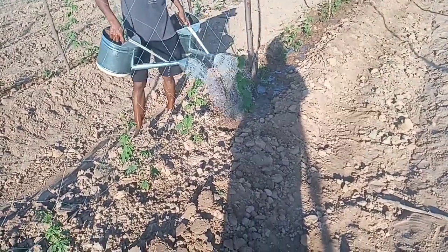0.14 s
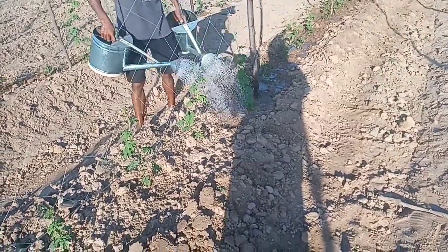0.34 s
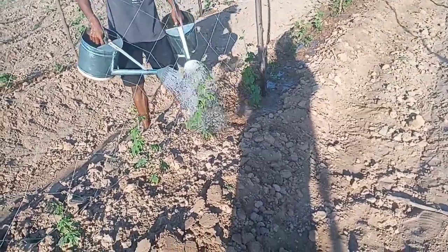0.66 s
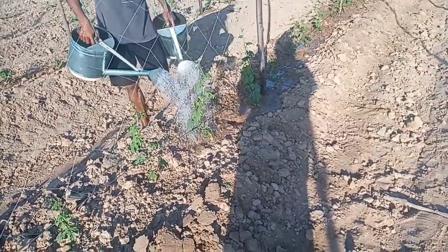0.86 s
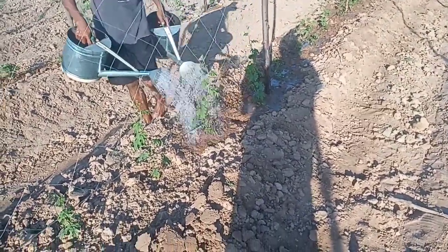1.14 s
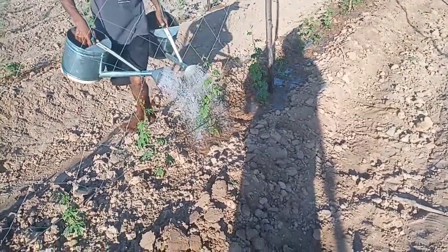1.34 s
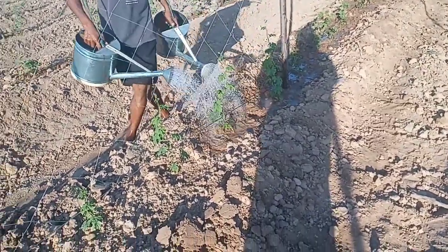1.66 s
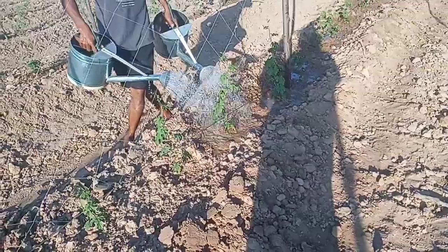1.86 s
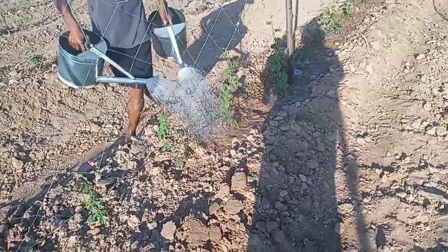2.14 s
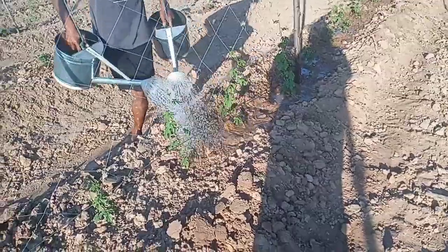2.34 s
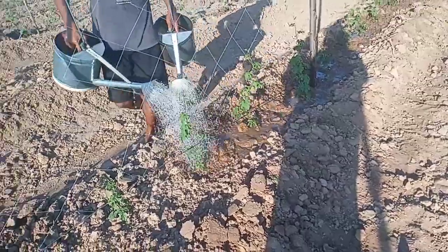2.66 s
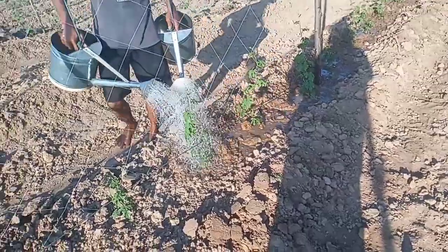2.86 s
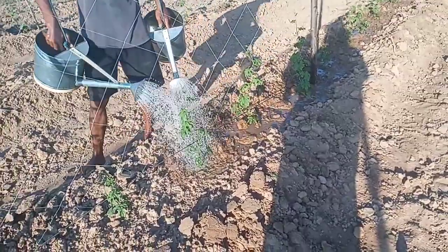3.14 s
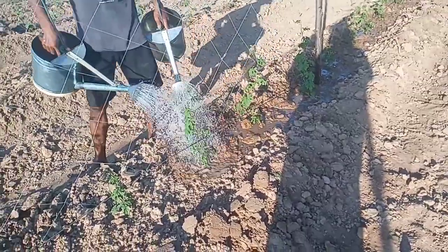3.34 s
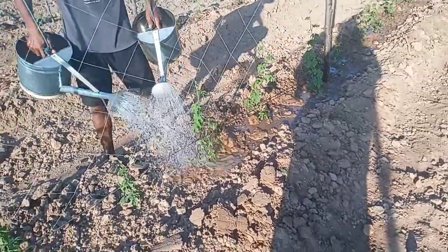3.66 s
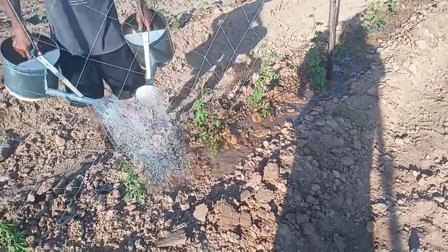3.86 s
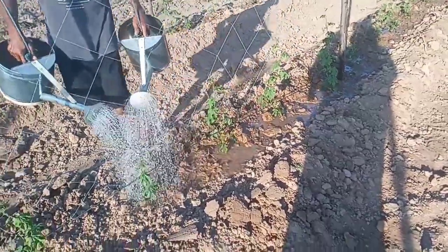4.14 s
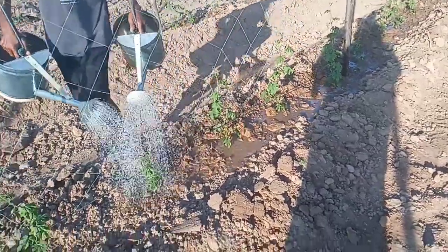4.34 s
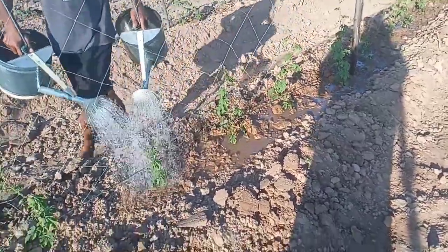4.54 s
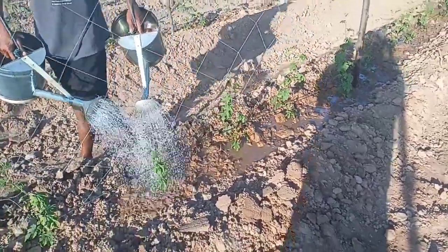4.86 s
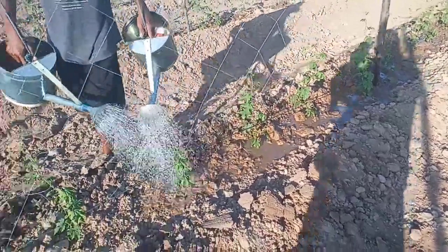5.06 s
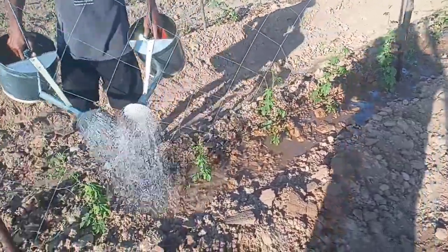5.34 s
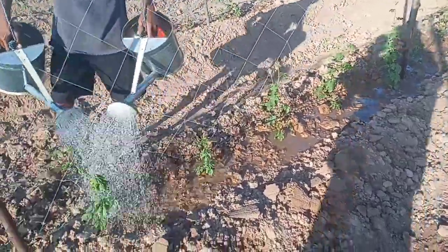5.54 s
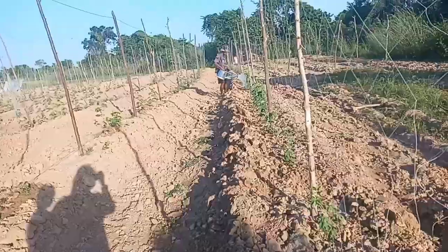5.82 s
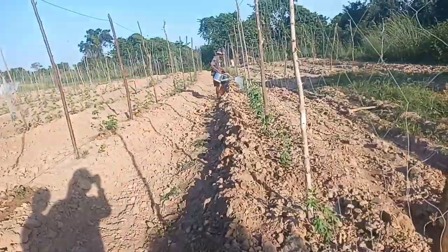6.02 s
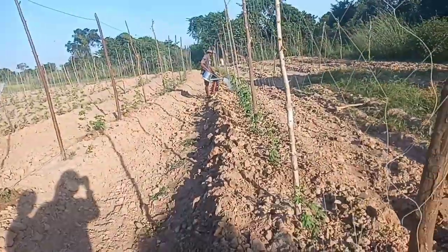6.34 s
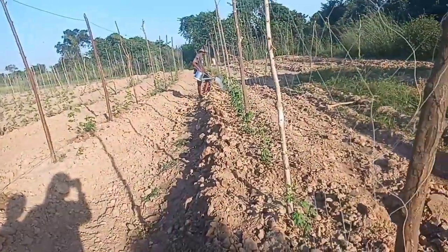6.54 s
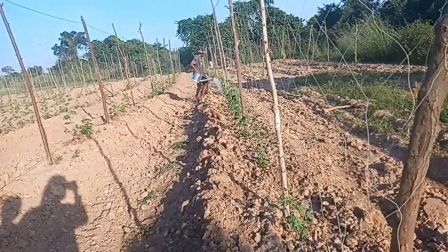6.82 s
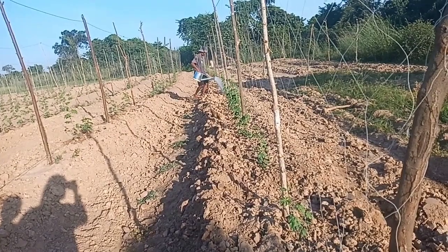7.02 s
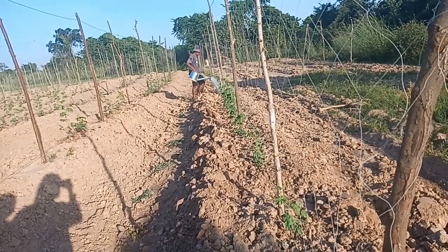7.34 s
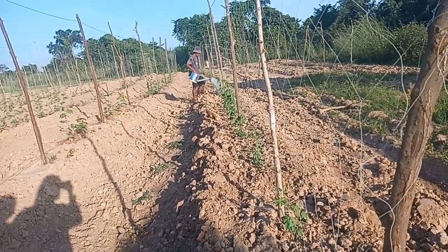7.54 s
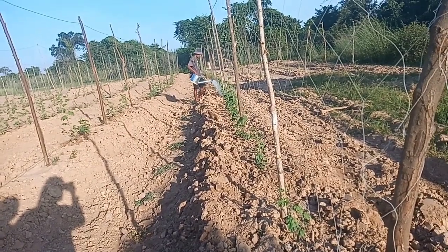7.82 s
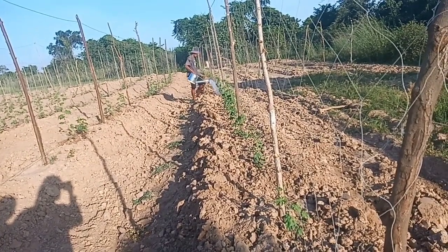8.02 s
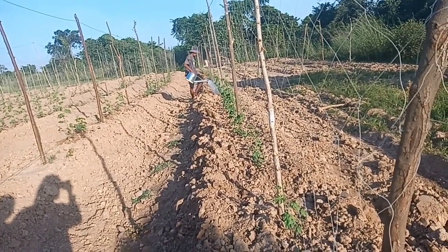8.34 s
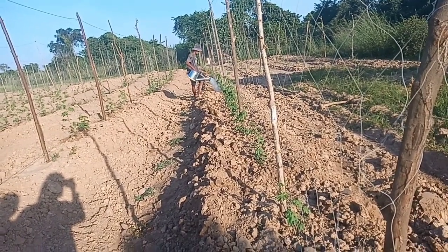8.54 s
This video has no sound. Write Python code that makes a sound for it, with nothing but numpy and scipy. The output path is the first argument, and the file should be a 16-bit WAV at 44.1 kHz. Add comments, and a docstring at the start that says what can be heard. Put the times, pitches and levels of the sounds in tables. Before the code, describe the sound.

From 0 to 5.7 seconds, two watering cans shower dry soil close by in an open field. Crisp mid-high patter mixes with wet puddle splashing and airy mist, swelling around 1.3, 1.8, 3.1 to 3.6 and 4.7 to 5.3, thinning near 0.7, 2.4, 4.1 and 5.5. Fat drops tick and plink throughout; run-off gurgles low, clearest near 0.5 and 4.9. A very close reflection makes the water slightly hollow. Faint low engine throbbing and wind rumble lie beneath, with a microphone thump at 4.2. At 5.7 the shower cuts abruptly with a tiny dull tick; a distant view fades in by 6.1. The watering is now much quieter, blurred and patchy. A high cricket chirps about seven times a second, faint falling cheeps come at 6.2 and 6.8, and the far engine wavers and weakens. Soft wind bumps occur near 6.1 and 7.4. It ends at 8.7.

```python
"""Watering cans on dry soil

Two watering cans shower dry soil and seedlings in an open field: close by, then, after a cut and fade-in, far off.
Showers are clumped random impulses over noise, filtered into patter, splash and mist; a few big drops ring
as decaying sines, and run-off gurgles in narrow bands. A nearby surface echoes the close shower about 1 ms late.
A cricket and a bird are gliding sines, a small far engine is puffs through a resonance, and wind is low noise
with thumps on the microphone. A noise suppressor thins it all."""
import sys
import numpy as np
from scipy import signal
from scipy.fft import rfft, irfft, next_fast_len
from scipy.io import wavfile
from scipy.ndimage import uniform_filter1d, minimum_filter1d, map_coordinates

SR = 44100
rng = np.random.default_rng(int(sys.argv[2]) if len(sys.argv) > 2 else 0)


def inscribe(sig):
    """Save sig as 16-bit PCM at rate SR to the path in sys.argv[1].

    A 1-D sig is mono; a 2-D sig holds one channel per row.
    Samples are clipped to [-1, 1] before scaling.
    """
    pcm = np.round(np.clip(np.atleast_2d(sig).T, -1, 1) * 32767)
    wavfile.write(sys.argv[1], SR, pcm.astype(np.int16))


N = 382788
CUT_S = 5.7128   # close view before, far view after


def amp(db):
    """Decibels to gain."""
    return 10 ** (np.asarray(db) / 20)


def rms_one(x):
    """Scale to unit rms."""
    return x / np.sqrt(np.mean(x ** 2) + 1e-20)


def in_time(rows):
    """Table columns as curves, one value a sample; the first column is time in seconds."""
    s, *columns = np.transpose(rows)
    return [np.interp(np.arange(N) / SR, s, c) for c in columns]


def drift(rate_hz):
    """Slow random curve of rms 1: two-pole low-passed noise, computed every 40 samples."""
    pole = np.exp(-2 * np.pi * rate_hz * 40 / SR)
    noise = rng.standard_normal(N // 40 + 2002)
    slow = signal.lfilter([1], [1, -2 * pole, pole ** 2], noise)[2000:]   # settled part
    return np.interp(np.arange(N) / 40, np.arange(len(slow)), rms_one(slow))


def colour(x, spectrum):
    """Minimum-phase filter of unit energy, its spectral shape given as (Hz, relative dB) rows."""
    hz, db = np.transpose(spectrum)
    grid_hz = np.maximum(np.linspace(0, SR / 2, 4097), 1)
    grid_db = np.interp(np.log(grid_hz), np.log(hz), db)
    cepstrum = irfft(np.log(amp(grid_db)))
    cepstrum[1:4096] *= 2   # fold to causal
    cepstrum[4097:] = 0
    response = irfft(np.exp(rfft(cepstrum)))
    return signal.oaconvolve(x, response / np.sqrt(np.sum(response ** 2)))[:N]


def patchy(x, low_hz, high_hz, depth_db, rate_hz):
    """Ten narrow bands swell and sink, each in its own time; rms 1."""
    edges_hz = np.geomspace(low_hz, high_hz, 11)
    total = np.zeros(N)
    for k, edge_pair in enumerate(zip(edges_hz, edges_hz[1:])):
        sos = signal.butter(2, edge_pair, "band", fs=SR, output="sos")
        band = signal.sosfilt(sos, x)
        total += (-1) ** k * band * amp(depth_db * drift(rate_hz))
    return rms_one(total)


def drops(per_s, spread_db, clump_db):
    """Drops land at random, uneven in size and in clumps, over the hiss of the finest ones; rms 1."""
    sizes = amp(spread_db * np.minimum(rng.exponential(1, N), 5)) * rng.choice([-1, 1], N)
    landed = rng.random(N) < per_s / SR
    clumps = amp(clump_db * (drift(16) + drift(50)))
    finest = .5 * rng.standard_normal(N)
    return rms_one(clumps * (rms_one(sizes * landed) + finest))


def near_shower():
    """Partly shared drops sound on soil, in puddles and as mist; big drops and gurgle join, a surface echoes all."""
    # Swells over each seedling, thins on the step to the next.
    # Each row: time in seconds, patter on soil in dB, splash in puddles in dB.
    near_levels = [(0.0, -40, -50.5), (0.55, -44.5, -48.5), (0.76, -45, -56), (1.0, -42, -49),
                   (1.3, -39, -44.5), (1.6, -42, -44), (1.78, -39, -44.5), (2.4, -42, -51.5),
                   (2.75, -40, -45), (3.1, -39, -43), (3.57, -39.5, -42.5), (3.92, -44.5, -53),
                   (4.15, -46.5, -51.5), (4.35, -41.5, -49), (4.7, -41.5, -42), (5.3, -41.5, -43),
                   (5.48, -46, -51.5), (5.7, -46.5, -49.5)]
    # Each row of the three colours: frequency in Hz, relative level in dB per Hz.
    patter_colour = [(900, -53.5), (1800, -6.5), (2600, -3), (3300, -0.5), (3950, 0.5), (4600, -7),
                     (5500, -18), (6300, -14.5), (7300, -20.5), (8500, -74), (15000, -37)]
    splash_colour = [(350, -22), (600, -7.5), (780, -1), (1000, -0.5), (1300, -0.5), (1800, 2.5),
                     (2600, -9.5), (5000, -38)]
    mist_colour = [(5000, -10.5), (8000, 1.5), (9800, -5), (11500, -3.5), (12800, -8), (13700, -10),
                   (15400, -1.5)]
    patter_db, splash_db = in_time(near_levels)
    mean_patter_db = np.mean(np.transpose(near_levels)[1])
    mist_db = -62 + .15 * (patter_db - mean_patter_db)   # mist follows a share of the patter's swing
    rain = drops(per_s=5000, spread_db=3.5, clump_db=0.32)
    puddle = drops(per_s=3000, spread_db=4.5, clump_db=-1.34)
    fine = drops(per_s=13000, spread_db=5.0, clump_db=1.0)
    water = amp(patter_db) * colour(rain, patter_colour)
    water += amp(splash_db) * colour(0.45 * rain + 0.78 * puddle, splash_colour)
    water += amp(mist_db) * colour(0.56 * rain + 0.99 * fine, mist_colour)
    water += big_drops() + gurgle()
    return water + echo(water)


def big_drops():
    """Fat drops stand out of the shower, each ringing briefly at its own pitch."""
    # Each row: start in seconds, envelope peak in dB, ring frequency in Hz.
    fat_drops = [(0.0393, -33, 3610), (0.7267, -34, 3940), (1.0665, -32, 3350), (1.2486, -30, 3250),
                 (1.7275, -31, 3890), (2.3745, -29, 3280), (2.7541, -31, 3920), (3.1158, -31, 3220),
                 (3.5309, -30, 1210), (3.5718, -30, 3240), (4.3485, -27, 3910), (4.793, -33, 3780),
                 (5.0699, -32, 1730), (5.3058, -31, 1740)]
    out, age_s, peak_s = np.zeros(N), np.arange(300) / SR, .0006
    envelope = age_s / peak_s * np.exp(1 - age_s / peak_s)
    for s, db, hz in fat_drops:
        out[round(s * SR):][:300] += amp(db) * np.sin(2 * np.pi * hz * age_s) * envelope
    return out


def gurgle():
    """Run-off gurgles as low drop noise in narrow, wavering bands."""
    # Each row: time in seconds, level in dB.
    gurgle_levels = [(0.0, -64), (0.5, -50.5), (1.2, -58.5), (1.8, -54), (2.2, -57), (3.0, -54), (3.6, -55),
                     (4.15, -61), (4.5, -52.5), (4.8, -54), (4.9, -49), (5.0, -54), (5.7, -62.5)]
    # Each row: frequency in Hz, relative level in dB per Hz.
    gurgle_colour = [(150, -20), (250, -7.5), (400, 1.5), (550, 6.5), (900, -17), (1200, -28)]
    level_db, = in_time(gurgle_levels)
    trickle = colour(drops(per_s=600, spread_db=1.5, clump_db=0.5), gurgle_colour)
    return amp(level_db) * patchy(trickle, 192, 1026, depth_db=4.5, rate_hz=6.9)


def echo(x):
    """A dull reflection whose phase turns with pitch, at a moving lag that combs the colour."""
    # Lag as the gardener comes closer. Each row: time in seconds, lag in ms.
    echo_lags = [(0.4, 1.115), (1.2, 1.04), (1.85, 1.095), (2.65, 1.015), (3.45, 1.015), (4.2, 0.875),
                 (5.1, 0.88), (5.55, 0.84)]
    level_db, cut_hz, top_hz = -1, 960, 6000
    turn_rad, turn_hz = 2.1, 1050
    treble_share = 0.48   # still returned above cut_hz, up to top_hz
    lag_ms, = in_time(echo_lags)
    size = next_fast_len(N)
    hz = np.arange(size // 2 + 1) * SR / size
    surface = np.exp(1j * turn_rad * np.tanh((hz / turn_hz) ** 2))
    surface *= treble_share + (1 - treble_share) / (1 + (hz / cut_hz) ** 2)
    surface /= 1 + (hz / top_hz) ** 4
    turned = irfft(rfft(x, size) * surface, size)
    read_at = np.arange(N) - lag_ms * SR / 1000
    return amp(level_db) * map_coordinates(turned, [read_at], order=3)


def far_shower():
    """Distance blurs the drops; the splash's bands sink and swell in patches, as a noise suppressor leaves them."""
    # Each row: time in seconds, patter in dB, splash in dB.
    far_levels = [(6.1, -57, -67.5), (6.3, -55.5, -65.5), (6.8, -57, -68.5), (7.08, -59.5, -69),
                  (7.5, -56, -68), (7.66, -58.5, -66.5), (7.85, -56, -66), (8.3, -59, -70),
                  (8.45, -58, -67.5), (8.68, -59, -73)]
    # Each row of both colours: frequency in Hz, relative level in dB per Hz.
    patter_colour = [(1500, -18), (2100, -6.5), (2500, -7), (3000, -3), (3950, -0.5), (5400, -16.5),
                     (6200, -13), (7300, -17.5), (8600, -31.5), (10000, -34.5), (12000, -32), (15400, -39)]
    splash_colour = [(500, -12), (800, -18), (980, -6), (1070, 6), (1300, 4), (1900, -4), (2500, -6),
                     (4000, -7)]
    patter_db, splash_db = in_time(far_levels)
    patter = colour(drops(per_s=4000, spread_db=1.5, clump_db=0.67), patter_colour)
    splash = colour(drops(per_s=4000, spread_db=3.0, clump_db=-1.7), splash_colour)
    splash = patchy(splash, 608, 2990, depth_db=4.0, rate_hz=2.5)
    return amp(patter_db) * patter + amp(splash_db) * splash


def cricket():
    """Short, nearly even chirps; the pitch peaks near mid-chirp and sags at both ends."""
    start_s, period_s, length_s = 5.768, .1339, .018
    peak_hz, sag_hz, level_db = 7350, 300, -63.5
    phase = np.linspace(-1, 1, round(length_s * SR))
    hz = peak_hz - sag_hz * (phase + .15) ** 2
    chirp = np.sin(2 * np.pi * np.cumsum(hz) / SR) * np.sqrt(1 - phase ** 2)
    beats_s = np.arange(start_s, N / SR - .03, period_s)
    jitter_s = .001 * rng.standard_normal(len(beats_s))
    spread_db = 0.43 * rng.standard_normal(len(beats_s))
    train = np.zeros(N)
    train[((beats_s + jitter_s) * SR).astype(int)] = amp(level_db + spread_db)
    return signal.oaconvolve(train, chirp)[:N]


def bird():
    """Faint short cheeps that slide down."""
    # Each row: start in seconds, envelope peak in dB, start frequency in Hz.
    cheeps = [(6.165, -54, 3100), (6.812, -49, 3570)]
    out, age = np.zeros(N), np.linspace(0, 1, 1100)   # age as share of a cheep
    for s, db, hz in cheeps:
        turns = np.cumsum(hz * (1 - 0.136 * age)) / SR
        out[round(s * SR):][:1100] += amp(db) * np.sin(np.pi * age) * np.sin(2 * np.pi * turns)
    return out


def engine():
    """Two puffs a turn, not quite evenly spaced, ring an exhaust resonance that differs by listening place."""
    # Level carried on the air: one list before the cut, one after.
    # Each row: time in seconds, level in dB.
    engine_levels = [
        [(0.0, -72), (2.0, -72.5), (2.7, -68), (3.1, -67), (3.6, -68.5), (4.8, -61), (5.7, -60)],
        [(6.1, -57.5), (6.2, -63), (6.5, -61.5), (7.0, -67.5), (7.1, -73.5), (7.7, -67), (7.8, -79),
         (7.95, -75), (8.2, -66), (8.3, -77), (8.68, -75)],
    ]
    turns_per_s, second_puff_turn = 25.62, .513
    near_pipe, far_pipe = (154, 24), (495, 90)   # centre Hz, width Hz
    turns = np.cumsum(turns_per_s * (1 + 0.0028 * drift(5))) / SR
    puff_count = np.floor(turns) + np.floor(turns - second_puff_turn)
    fired = np.diff(puff_count, prepend=-1) > 0
    puffs = rms_one(fired * amp(1.5 * rng.standard_normal(N))) + .4 * rng.standard_normal(N)

    def ring(centre_hz, width_hz):
        """The exhaust resonance as a band-pass; rms 1."""
        edges_hz = [centre_hz - width_hz / 2, centre_hz + width_hz / 2]
        return rms_one(signal.sosfilt(signal.butter(3, edges_hz, "band", fs=SR, output="sos"), puffs))

    throb = np.where(np.arange(N) / SR < CUT_S, ring(*near_pipe), ring(*far_pipe))
    level_db, = in_time(engine_levels[0] + engine_levels[1])
    return amp(level_db + 2.0 * drift(2.7)) * throb


def wind():
    """Lumpy low noise, plus gusts thumping the microphone as decaying sines."""
    # Each row: time in seconds, level in dB.
    wind_levels = [(0.0, -61), (0.8, -61), (1.5, -65), (3.2, -60.5), (4.2, -60), (5.7, -60), (6.2, -62.5),
                   (7.0, -64.5), (8.68, -66.5)]
    # Each row: frequency in Hz, relative level in dB per Hz.
    rumble_colour = [(18, -70), (35, -40), (55, -5.5), (90, 1), (150, 0.5), (200, -3.5), (250, -11),
                     (400, -16), (700, -25.5), (2000, -81)]
    # Each row: start in seconds, initial envelope in dB, frequency in Hz.
    bumps = [(4.233, -48, 71), (6.082, -48, 102), (6.103, -47, 83.5), (7.357, -52, 59)]
    level_db, = in_time(wind_levels)
    out = amp(level_db) * colour(rng.standard_normal(N) * amp(2.3 * drift(5.5)), rumble_colour)
    age_s = np.arange(4000) / SR
    for s, db, hz in bumps:
        out[round(s * SR):][:4000] += amp(db) * np.sin(2 * np.pi * hz * age_s) * np.exp(-age_s / 0.04)
    return out


def scene():
    """Close shower up to the cut, far shower, cricket and bird after it; engine and wind throughout."""
    before = np.arange(N) / SR < CUT_S
    far_view = far_shower() + cricket() + bird()
    return (np.where(before, near_shower(), far_view) + engine() + wind())[None]


def suppress(x):
    """Noise suppressor: takes out a share of each band's steady power, so bands near it sink in patches."""
    # Each row: frequency in Hz, share of the steady power taken out.
    taken_shares = [(100, 0.81), (600, 0.33), (1800, 0.31), (3500, 0.14), (12000, 0.25)]
    floor_db = -11
    hz, _, z = signal.stft(x, SR, nperseg=1024, noverlap=768)
    power = uniform_filter1d(np.abs(z) ** 2, size=5, axis=1)   # over time
    power = uniform_filter1d(power, size=3, axis=0) + 1e-20   # over frequency
    steady = minimum_filter1d(uniform_filter1d(power, size=20, axis=1), size=150, axis=1)
    share = np.interp(hz, *np.transpose(taken_shares))[:, None]
    gain = np.sqrt(np.maximum(1 - share * steady / power, amp(2 * floor_db)))
    return signal.istft(z * gain, SR, nperseg=1024, noverlap=768)[1][:len(x)]


def record(dry):
    """Each view is suppressed apart; a very brief, faint dull burst around the cut, then a fade-in; top cut."""
    fade_start_s, fade_length_s, return_s = 5.745, .32, 5.7545   # far view muted until return_s
    burst_gain_db, burst_db_per_s, hiss_db = -57, 1300, -110
    cutoff_hz = 15450
    t, cut = np.arange(N) / SR, int(CUT_S * SR)
    cleaned = np.concatenate([suppress(dry[0, :cut]), suppress(dry[0, cut:])])
    fade = np.clip((t - fade_start_s) / fade_length_s, 0, 1) * (t > return_s)
    dull_noise = signal.lfilter([.1], [1, -.9], rng.standard_normal(N))
    burst = dull_noise * amp(burst_gain_db - burst_db_per_s * np.abs(t - CUT_S))   # both sides of the cut
    edited = cleaned * np.where(t < CUT_S, 1, fade) + burst + amp(hiss_db) * rng.standard_normal(N)
    low_pass = signal.cheby2(14, 60, cutoff_hz + 150, fs=SR, output="sos")   # 60 dB down at this edge
    return signal.sosfilt(low_pass, edited)[None]


dry = scene()
out = record(dry)
inscribe(out)
```